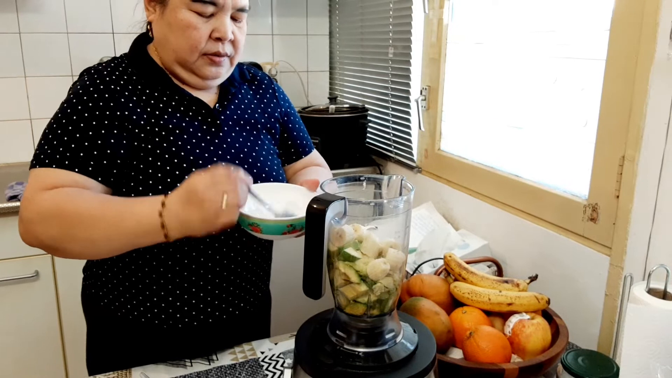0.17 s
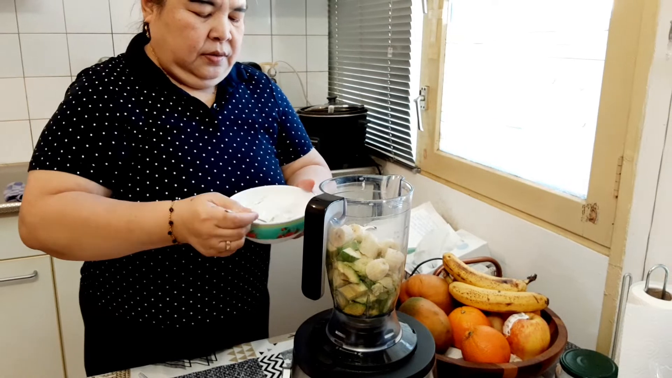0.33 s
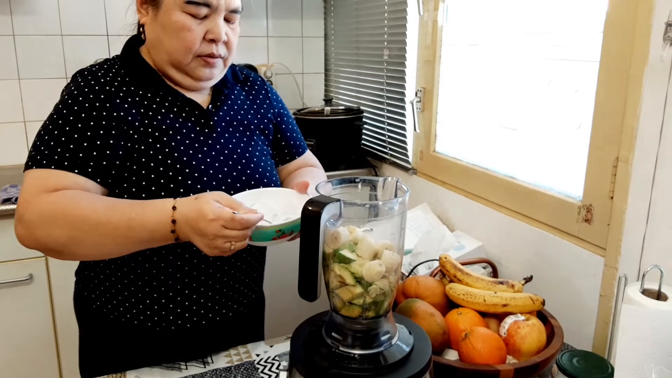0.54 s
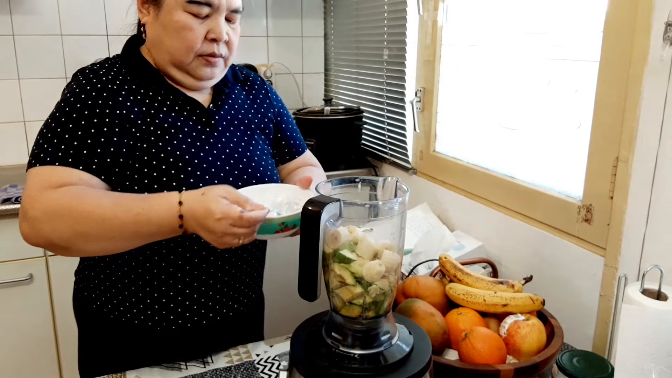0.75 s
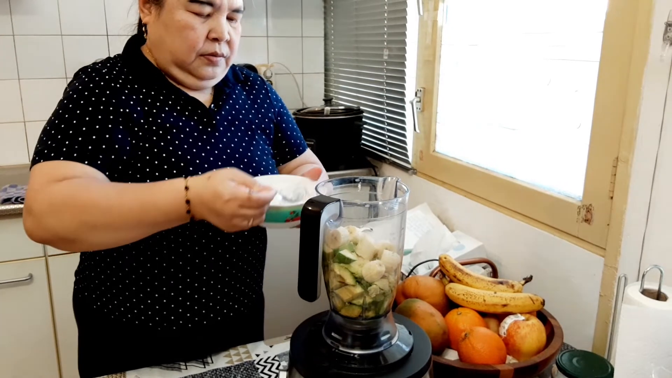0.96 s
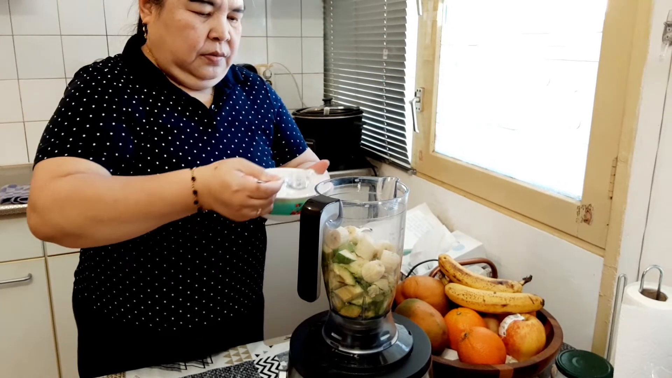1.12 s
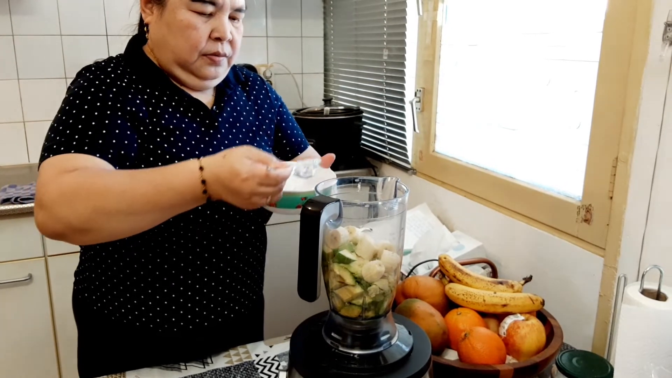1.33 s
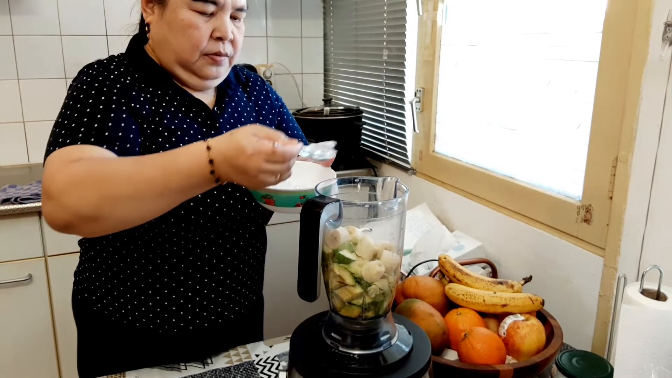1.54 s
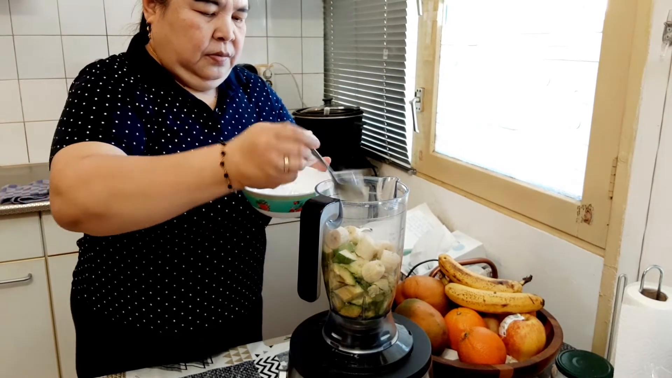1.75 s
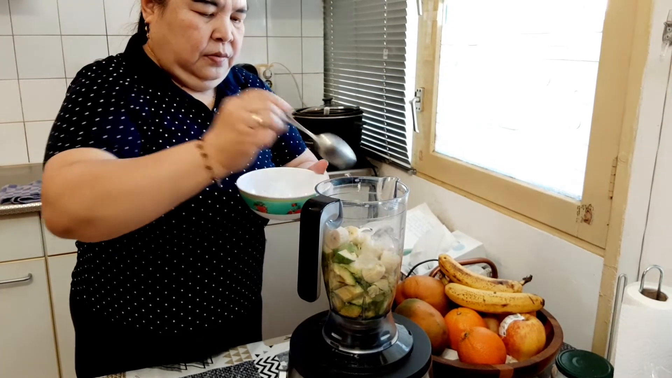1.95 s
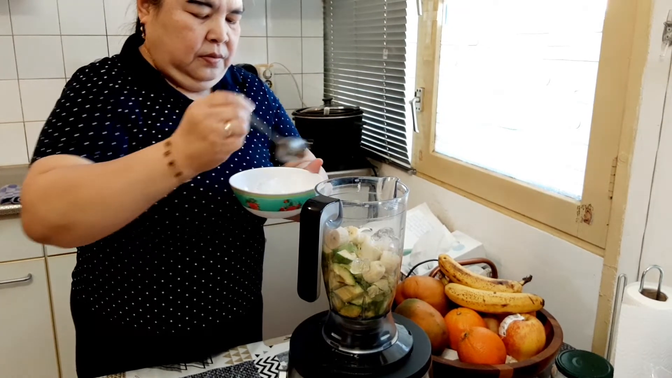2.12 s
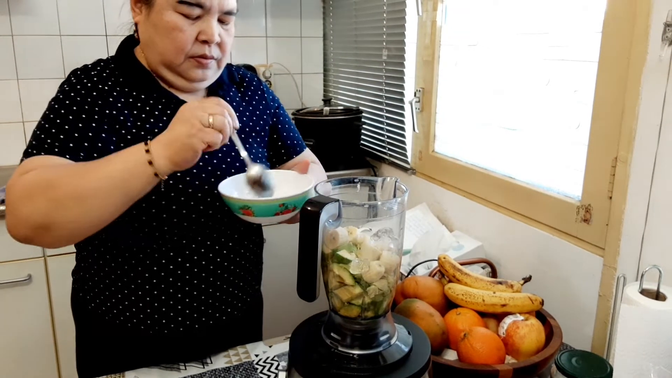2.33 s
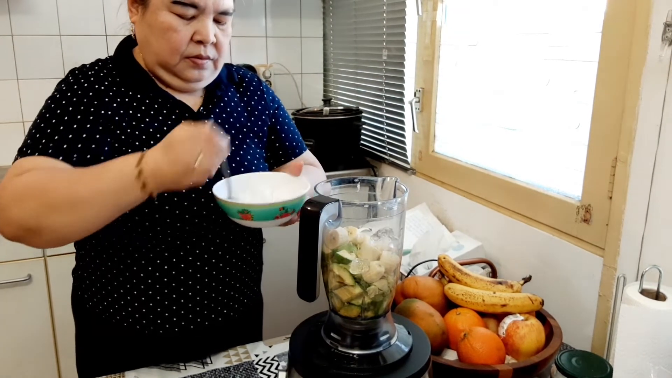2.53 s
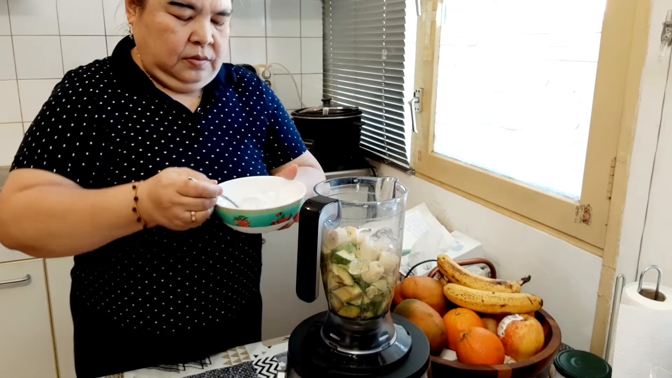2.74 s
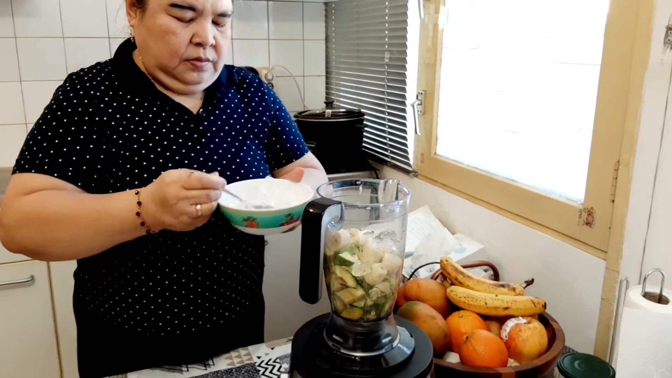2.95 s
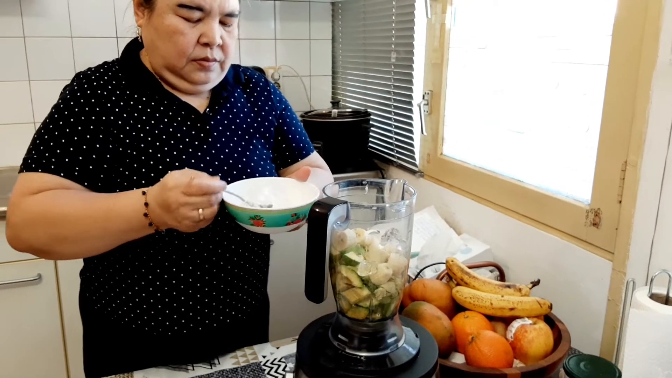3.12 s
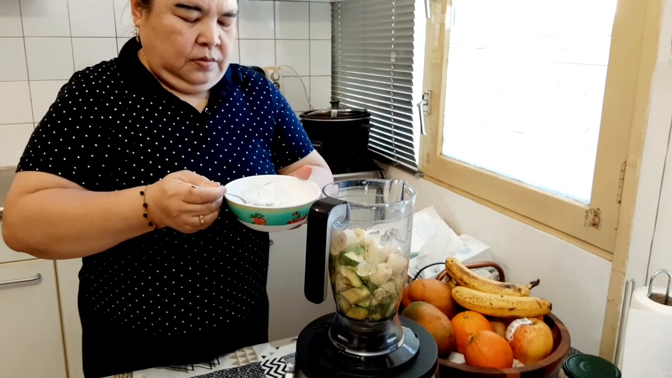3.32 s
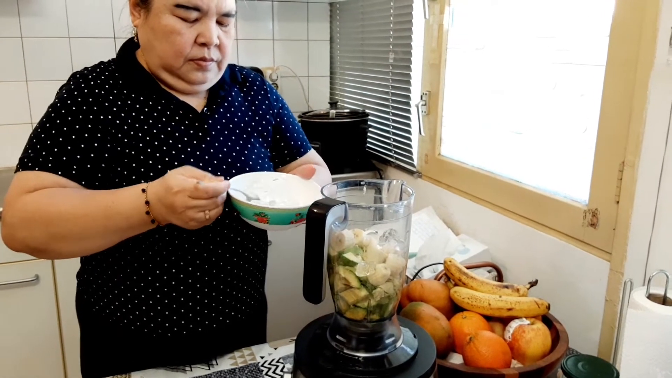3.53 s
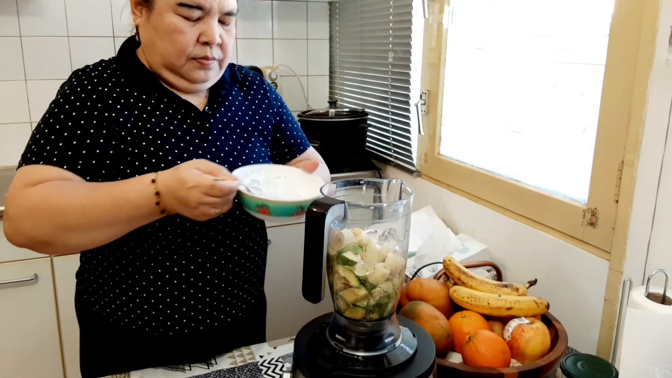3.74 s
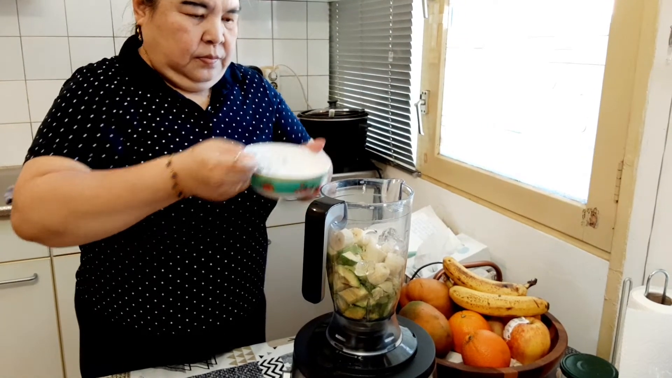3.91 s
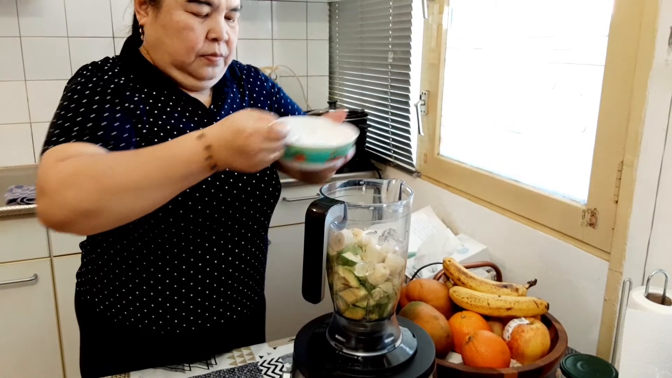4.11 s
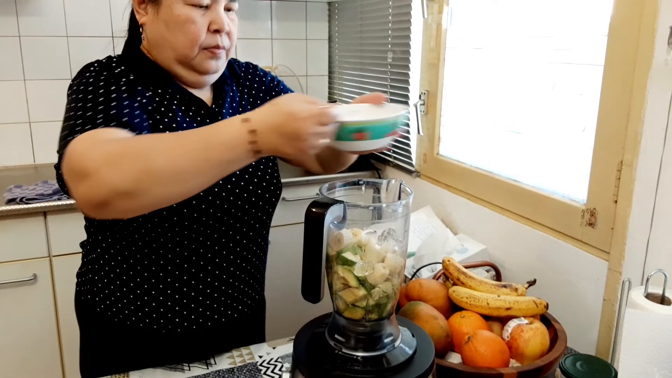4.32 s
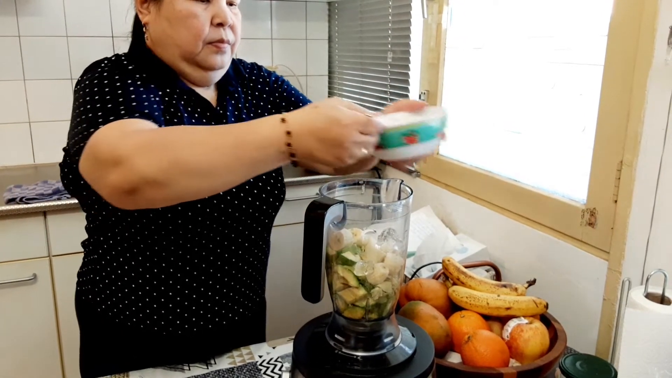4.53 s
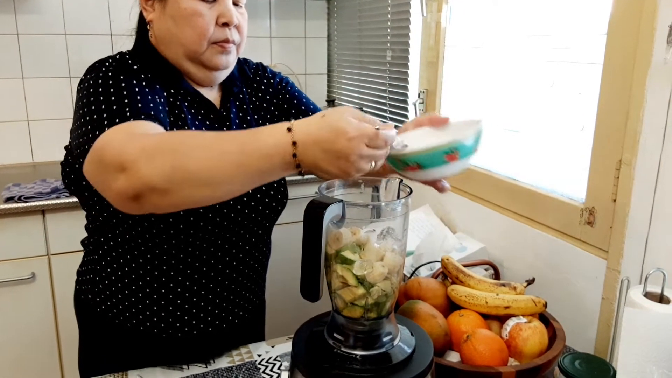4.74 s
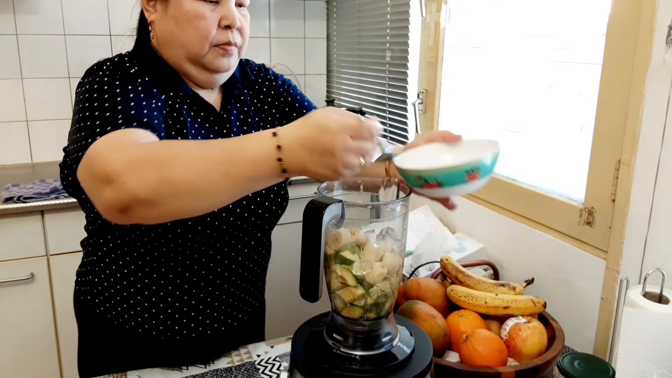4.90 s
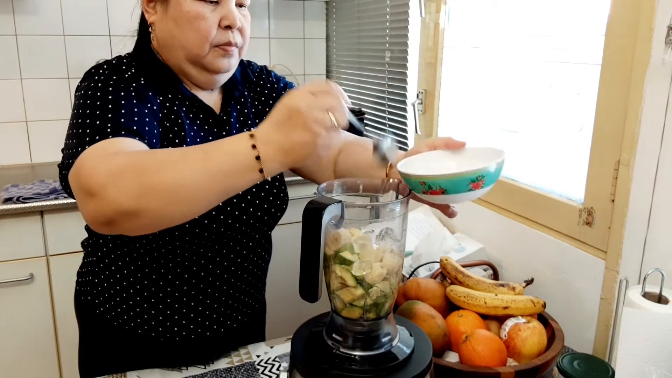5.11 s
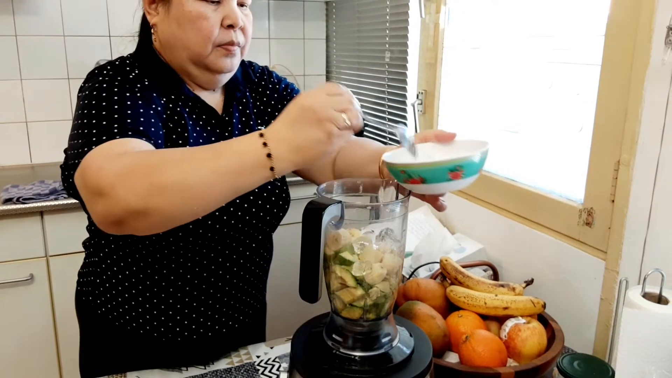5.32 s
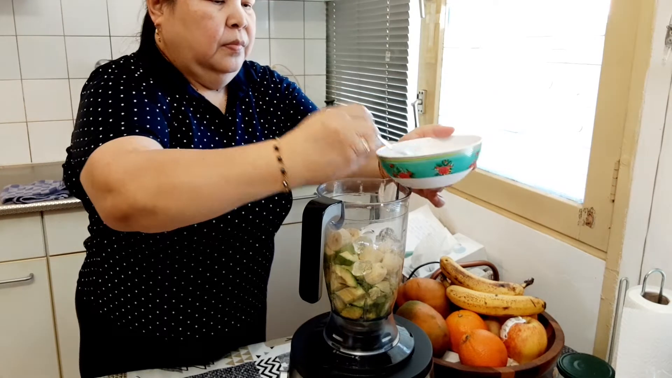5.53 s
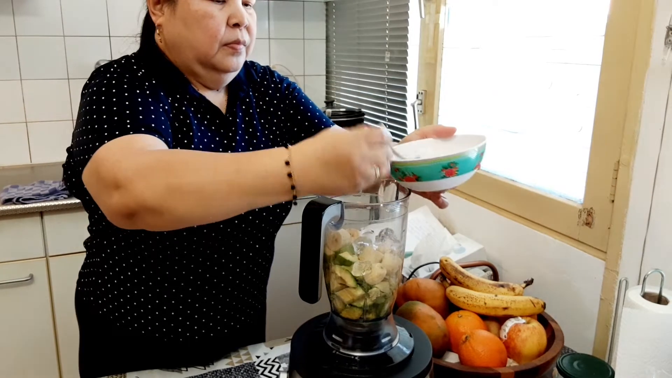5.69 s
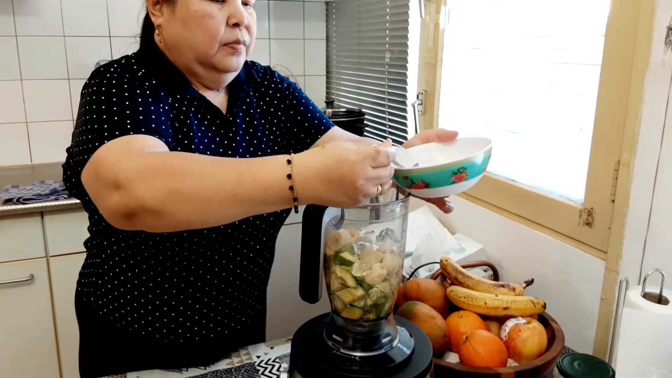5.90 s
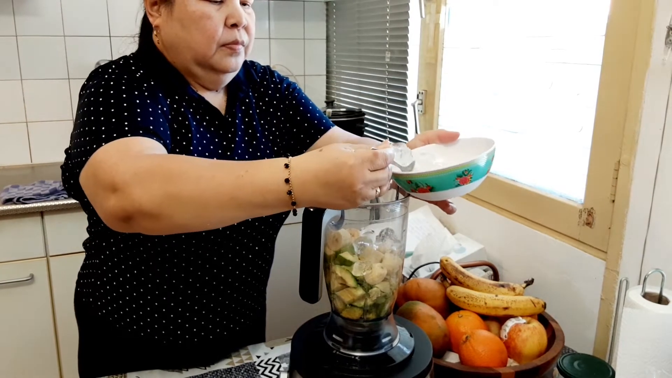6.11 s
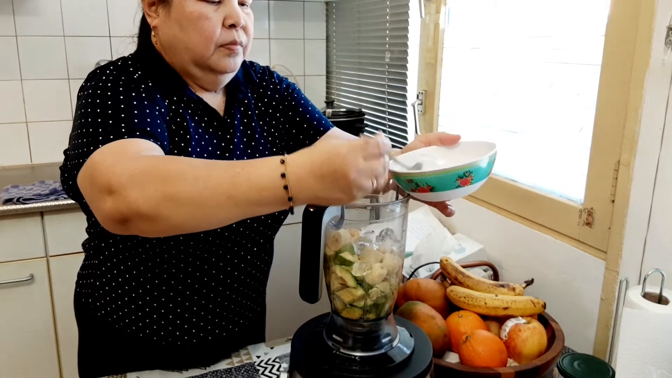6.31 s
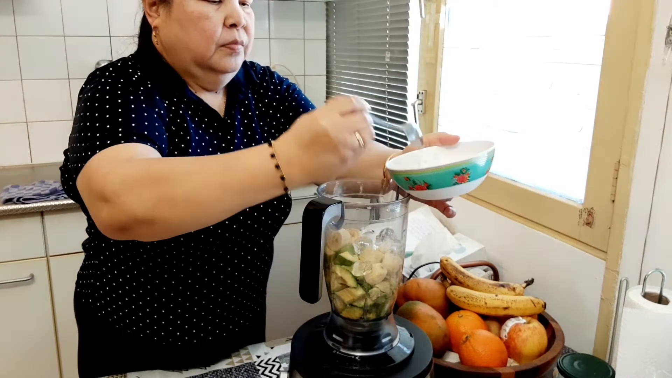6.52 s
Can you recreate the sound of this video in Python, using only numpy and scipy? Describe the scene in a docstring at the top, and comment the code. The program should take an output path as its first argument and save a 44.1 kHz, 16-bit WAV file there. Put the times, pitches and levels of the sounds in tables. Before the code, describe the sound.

Ice is spooned from a bowl into a blender jug holding fruit. Crunchy strokes and small bowl knocks lead to a rapid, hollow plastic clatter, then renewed digging, loose cubes rattling and a quieter shuffle. Another scoop ends in thuds and a bright spoon strike, followed by more scraping. Close pickup with short, hard tile echoes; a bird chirps very faintly outside.

```python
"""Ringing tiled kitchen: ice cubes are spooned out of a bowl into a plastic blender jug of cut fruit.
Coloured pulses make the knocks; resonators make bowl, jug and steel spoon ring after them.
Random ticks and friction hiss make the spoon's strokes through the ice; low noise bursts, the thuds on fruit.
A bird of raspy falling harmonics chirps faintly outside; room air and appliance hum lie underneath."""
import sys
import numpy as np
from scipy import signal
from scipy.fft import rfft, irfft, next_fast_len
from scipy.io import wavfile
from scipy.ndimage import uniform_filter1d

SR = 44100
rng = np.random.default_rng(int(sys.argv[2]) if len(sys.argv) > 2 else 0)


def dump_mix(stems):
    """Bounce the given channels to the path in sys.argv[1] as a 16-bit WAV at rate SR."""
    frames = np.atleast_2d(stems).T  # one column per channel
    limited = np.clip(frames, -1, 1)  # hard clip at full scale
    pcm = np.round(limited * 32767).astype(np.int16)
    wavfile.write(sys.argv[1], SR, pcm)


N = 289075
TIME = np.arange(N) / SR


def from_db(db):
    """Decibels to gain."""
    return 10 ** (np.asarray(db) / 20)


def rms_one(x):
    """Scale to rms 1."""
    return x / np.sqrt(np.mean(x ** 2) + 1e-20)


def at_hz(points, hz):
    """Read a table of (f/Hz, value) on a log-frequency axis."""
    table_hz, values = np.transpose(points)
    return np.interp(np.log(np.maximum(hz, 1)), np.log(table_hz), values)


def add(track, start_s, sound):
    """Mix a sound into the track."""
    start = round(start_s * SR)
    track[start:start + len(sound)] += sound[:N - start]


def split_filter(x, edges_hz, kind):
    """Third-order Butterworth filter."""
    return signal.sosfilt(signal.butter(3, edges_hz, kind, fs=SR, output="sos"), x)


def drift(per_s):
    """A slow random wander of spread about 1."""
    steps = rng.standard_normal(1000)
    return np.interp(TIME * per_s, np.arange(len(steps)), steps)


def impulse_of(colour_db, size=4096):
    """Minimum-phase pulse whose spectrum in dB is colour_db(hz), by folding the cepstrum."""
    cepstrum = irfft(np.log(from_db(colour_db(np.fft.rfftfreq(size, 1 / SR)))))
    cepstrum[1:size // 2] *= 2
    cepstrum[size // 2 + 1:] = 0
    return irfft(np.exp(rfft(cepstrum)))


def coloured(x, spectrum):
    """Filter by a table of (f/Hz, gain/dB)."""
    return signal.fftconvolve(x, impulse_of(lambda hz: at_hz(spectrum, hz)))[:len(x)]


def resonances(x, modes):
    """Ringing of a body's modes driven by x: one two-pole resonator per (f/Hz, width/Hz, peak gain/dB)."""
    out = np.zeros(N)
    for hz, width_hz, db in modes:
        r = np.exp(-np.pi * width_hz / SR)
        zeros = [(1 - r * r) / 2, 0, (r * r - 1) / 2]
        poles = [1, -2 * r * np.cos(2 * np.pi * hz / SR), r * r]
        out += from_db(db) * signal.lfilter(zeros, poles, x + 1e-18)
    return out


def chatter(pulse, gaps_s, rebound=0.74):
    """A hard contact rebounds within a few milliseconds: allpass echoes smear the pulse."""
    size = next_fast_len(len(pulse), True)
    hz, spectrum = np.fft.rfftfreq(size, 1 / SR), rfft(pulse, size)
    for gap_s in gaps_s:
        delay = np.exp(-2j * np.pi * hz * round(gap_s * SR) / SR)
        spectrum = spectrum * (delay - rebound) / (1 - rebound * delay)
    return irfft(spectrum, size)[:len(pulse)]


# spectrum shape of the room air: f/Hz, relative density/dB
ROOM_TONE = [(20, -26.5), (60, -12), (130, 2), (300, -1.5), (650, -7), (1300, -6.5), (2000, -3),
             (3000, -36.5), (7000, -31.5), (9000, -53.5), (15000, -18)]
# appliance hum: f/Hz, rms level/dB
HUM = [(193.8, -92), (301.5, -69.5)]
ROOM_TONE_DB = -63.5


def background():
    """Coloured noise for quiet room air, steady sines for a faint appliance hum."""
    air = from_db(ROOM_TONE_DB) * rms_one(coloured(rng.standard_normal(N), ROOM_TONE))
    hum = sum(from_db(db) * np.sqrt(2) * np.sin(2 * np.pi * hz * TIME) for hz, db in HUM)
    return air + hum


# kitchen reverberation: f/Hz, t60/s
KITCHEN_T60 = [(100, 0.18), (400, 0.42), (1000, 0.39), (2700, 0.36), (7000, 0.3), (15000, 0.26)]


def kitchen(first_echo_s=0.0015, echoes_per_s=2500, smooth_db=-4):
    """Room response of energy 1: distinct tile echoes in a diffuse tail, each band with its own decay."""
    t = TIME[:int(.7 * SR)]
    echoes = rng.standard_normal(len(t)) * (rng.random(len(t)) < echoes_per_s / SR)
    spectrum = rfft(rms_one(echoes) + from_db(smooth_db) * rng.standard_normal(len(t)))
    hz, centres_hz = np.fft.rfftfreq(len(t), 1 / SR), np.geomspace(100, 16000, 16)
    tail = np.zeros(len(t))
    for centre_hz, pick in zip(centres_hz, np.eye(len(centres_hz))):
        share = np.interp(hz, centres_hz, pick)  # triangular band
        decay = from_db(-60 * t / at_hz(KITCHEN_T60, centre_hz))
        band = irfft(spectrum * share, len(t)) * decay * (t > first_echo_s)
        tail += rms_one(band) * np.sqrt(share.mean())
    return rms_one(tail) / np.sqrt(len(t))


def in_kitchen(x, split_hz=2900, slow_per_s=4, fast_per_s=140):
    """Each spot has its own echoes: long waves follow the moving hands, short ones differ from cube to cube."""
    low, high = split_filter(x, split_hz, "low"), split_filter(x, split_hz, "high")
    spots, out = np.arange(7), np.zeros(N)
    for here in np.eye(len(spots)):
        # equal-power crossfades cycling through the spots
        slow, fast = (np.sin(np.pi / 2 * np.interp(TIME * rate, spots, here, period=len(spots)))
                      for rate in (slow_per_s, fast_per_s))
        out += signal.fftconvolve(low * slow + high * fast, kitchen())[:N]
    return out


# bird chirps: t/s, relative level/dB, starting f/Hz, length/s
CHIRPS = [(1.548, -54.5, 1228, 0.074), (2.074, -58, 1128, 0.047), (2.253, -59.5, 1285, 0.11),
          (2.316, -52, 1140, 0.029), (4.819, -57, 1265, 0.043), (4.878, -53, 1146, .055),
          (5.084, -55, 1128, 0.036), (5.209, -51.5, 1116, 0.035)]
# partials of a chirp: multiple of the pitch, relative level/dB
CHIRP_PARTIALS = [(1, -3.5), (2, 2.5), (4, -12), (5, -14), (7, -18)]
CHIRP_FALL_HZ = 172


def bird(waver=0.0614, yard_db=-3, yard_t60_s=0.7):
    """Short raspy falling chirps, strongest on the second partial, echoing between the walls outside."""
    out, t = np.zeros(N), TIME[:SR]
    for s, db, first_hz, length_s in CHIRPS:
        progress = np.linspace(0, 1, int(length_s * SR))
        wobble = rms_one(uniform_filter1d(rng.standard_normal(SR), size=50))[:len(progress)]
        pitch_hz = (first_hz - CHIRP_FALL_HZ * progress) * (1 + waver * wobble)
        phase = 2 * np.pi * np.cumsum(pitch_hz) / SR
        tone = sum(from_db(part_db) * np.sin(k * phase) for k, part_db in CHIRP_PARTIALS)
        envelope = np.sqrt(2) * np.sin(np.pi * np.sqrt(progress))
        add(out, s, from_db(db) * rms_one(tone) * envelope)
    yard = rms_one(rng.standard_normal(SR) * from_db(-60 * t / yard_t60_s)) / np.sqrt(SR)
    return out + from_db(yard_db) * signal.fftconvolve(out, yard)[:N]


# cubes landing on the fruit: t/s, relative level/dB, centre f/Hz
THUDS = [(5.031, -42, 413), (5.316, -29.5, 350), (5.957, -35.5, 287), (6.273, -37, 286), (6.366, -36, 303)]
# dull bumps of the hand on the bowl: t/s, relative level/dB, decay time constant/s
BUMPS = [(3.185, -52.5, 0.1), (3.245, -55, 0.084), (4.421, -54, 0.11), (4.521, -57, 0.19)]
THUD_DECAY_S, REBOUND_S, REBOUND_LOSS_DB = 0.026, 0.048, 9
BUMP_HZ = 149


def thuds(spread=1.66, attack_s=0.0011):
    """Soft contacts give only a short low rumble; each cube on the fruit rebounds once, weaker."""
    out, t = np.zeros(N), TIME[:SR // 2]
    hits = [(s + k * REBOUND_S, db - k * REBOUND_LOSS_DB, hz, THUD_DECAY_S)
            for s, db, hz in THUDS for k in range(2)]
    hits += [(s, db, BUMP_HZ, decay_s) for s, db, decay_s in BUMPS]
    for s, db, hz, decay_s in hits:
        band = signal.butter(2, [hz / spread, hz * spread], "band", fs=SR, output="sos")
        rumble = rms_one(signal.sosfilt(band, rng.standard_normal(len(t))))
        envelope = (1 - np.exp(-t / attack_s)) * np.exp(-t / decay_s)
        add(out, s, from_db(db) * rumble * envelope)
    return out


# a light knock is duller: strength/dB, bass gain/dB
KNOCK_BASS = [(-9, 1), (0, -7), (40.5, -11)]
# spectrum common to all knocks: f/Hz, gain/dB
KNOCK_COLOUR = [(25, -36), (60, -28), (150, -11), (300, -7), (650, -6.5), (1200, -2.5), (3000, -5.5),
                (5500, -2), (7600, -4.5), (8800, -10), (12000, -11), (15500, -16.5)]


def knocks(rows, gap_s, bass_hz=480, mid_low_hz=1200, mid_high_hz=2600, treble_hz=6000):
    """Each knock is a chattering pulse, coloured by the broad modes of the cube that is hit."""
    out = np.zeros(N)
    for (s, db, treble_db), draws in zip(rows, rng.random((len(rows), 16))):
        gaps_s = (.2 + .8 * draws[:4]) * gap_s
        cube_hz = 1500 * 10 ** draws[4:, None]
        bass_db = np.interp(db, *np.transpose(KNOCK_BASS))
        tilt = [(bass_hz, bass_db), (mid_low_hz, 0), (mid_high_hz, 0), (treble_hz, treble_db)]

        def colour_db(hz):
            """Tilt plus the strongest cube mode at each frequency, falling slightly to the treble."""
            modes = np.max(1 / (1 + ((hz / cube_hz - 1) * 35) ** 2), axis=0)
            return at_hz(tilt, hz) + 5 * modes - 2 * hz / (hz + 1500)

        softness = from_db(-np.clip(treble_db, -12, 4) / 2)  # dull contacts last longer
        add(out, s, from_db(db) * chatter(impulse_of(colour_db), gaps_s * softness))
    return coloured(out, KNOCK_COLOUR)


# cubes and spoon striking the jug: t/s, relative strength/dB, treble/dB
JUG_KNOCKS = [(1.772, -35, -12), (1.8528, 22, -16), (1.8652, 23.5, -11), (1.88, 25, -17),
              (1.8925, 14.5, -19), (1.9267, 20, -2), (1.937, 15.5, -26), (5.32, 3.5, -8.5),
              (5.422, 3, -11.5)]
# jug resonances: f/Hz, width/Hz, gain over the plain knock/dB
JUG_MODES = [(486.6, 13, 17.5), (778, 44, 9), (1270, 120, 1.5), (1384, 7.3, 3), (1740, 24, 12.5),
             (1786, 21, 9), (1980, 150, 3), (2120, 33, 3), (2310, 12, 1), (2570, 27, 4), (2690, 56, 3.5),
             (3460, 900, -5.5), (12900, 4300, 5)]


def jug(knock_db=-5.0, ring_db=0.0):
    """Falling cubes and the spoon set the plastic wall ringing."""
    blows = from_db(knock_db) * knocks(JUG_KNOCKS, gap_s=0.00095)
    return blows + from_db(ring_db) * resonances(blows, JUG_MODES)


# strokes through the ice: start t/s, length/s, relative level/dB, swell over the stroke/dB, treble/dB
STROKES = [(0.0, 0.17, -34, 5, 1), (0.192, 0.26, -29, -8.5, 3), (0.627, 0.14, -34.5, -11.5, -5),
           (0.846, 0.048, -30.5, -0.5, 1), (0.98, 0.25, -51.5, -5, 2.5), (1.761, 0.016, -36, -4, 4.5),
           (2.455, 0.28, -26.5, 0, 3.5), (2.816, 0.23, -27, -10.5, -8.5), (3.158, 0.16, -40.5, -9, 1.5),
           (3.49, 0.4, -47, 27, 2), (3.791, 0.14, -39.5, 26.5, -2), (4.062, 0.26, -43.5, -9.5, -1.5),
           (4.424, 0.37, -42, 6.5, -7), (5.03, 0.083, -50, 6, -1), (5.37, 0.15, -30, 17.5, -5.5),
           (5.675, 0.058, -21.5, -6.5, 7), (5.947, 0.068, -36, -9, 1), (6.113, 0.26, -35.5, 19.5, 2.5)]
# a light touch is duller: stroke level/dB, bass gain/dB
STROKE_BASS = [(-70, 20), (-36, 4), (-26, -1)]
STROKE_ATTACK_S, STROKE_RELEASE_S = 0.0084, 0.056
# between strokes the ice still shifts faintly in the held bowl
IDLE_DB, IDLE_BASS_DB, IDLE_TREBLE_DB = -71.5, 1, 12


def stroke_pressure():
    """Each stroke bites, swells or eases while it lasts, and lets go; gains of bass, middle and treble."""
    out, t = np.zeros((3, N)), TIME[:SR]
    for s, length_s, db, swell_db, treble_db in STROKES:
        level_db = db + swell_db * (np.minimum(t / length_s, 1) - .5)
        release = np.exp(-np.maximum(t - length_s, 0) / STROKE_RELEASE_S)
        gate = np.minimum(t / STROKE_ATTACK_S, 1) * release
        bass_db = np.interp(db, *np.transpose(STROKE_BASS))
        for band, tilt_db in zip(out, (bass_db, 0, treble_db)):
            add(band, s, gate * from_db(level_db + tilt_db))
    idle_db = IDLE_DB + np.array([[IDLE_BASS_DB], [0], [IDLE_TREBLE_DB]])
    return np.hypot(out, from_db(idle_db))


def slips(per_s, spread_db):
    """Stick-slip as random ticks of uneven size and either sign."""
    ticks = np.zeros(N)
    at = np.flatnonzero(rng.random(N) < per_s / SR)
    size_db = spread_db * np.minimum(rng.exponential(1, N)[at], 3)
    ticks[at] = from_db(size_db) * rng.choice([-1, 1], N)[at]
    return ticks


def cubes(per_s=170, shift_db=4, shifts_per_s=22):
    """The rubbed cubes ring briefly, and their pitches come and go as the heap shifts."""
    pitches_hz = np.geomspace(900, 9000, 16) * rng.uniform(.94, 1.06, 16)
    out = np.zeros(N)
    for hz in pitches_hz:
        rubs = slips(per_s, 3) * from_db(shift_db * drift(shifts_per_s))
        out += resonances(rubs, [(hz, hz / 28, 0)])
    return rms_one(out)


# spectrum of the grinding: f/Hz, gain/dB
GRIND_COLOUR = [(20, -62.5), (60, -18.5), (150, -22.5), (300, -6), (650, -3.5), (1200, 1.5), (2200, 0.5),
                (3600, -0.5), (5500, -7), (7600, -12), (8800, -17.5), (12000, -14), (15500, -28.5)]
# the spoon catches and jerks on its way through the heap
JERK_DB, JERKS_PER_S = 3, 35


def grinding(slips_per_s=320, spread_db=7.0, hiss_db=-10, cubes_db=-1.0, bass_hz=850, treble_hz=4000):
    """Wet ice sticks and slips on spoon and bowl: uneven ticks and ringing cubes over a thin friction hiss."""
    crunch = rms_one(chatter(slips(slips_per_s, spread_db), rng.uniform(.0001, .0006, 3)))
    ringing = from_db(cubes_db) * cubes()
    hiss = from_db(hiss_db) * rng.standard_normal(N)
    friction = rms_one(crunch + ringing + hiss)
    jerks = rms_one(from_db(JERK_DB * drift(JERKS_PER_S)))
    bands = [(bass_hz, "low"), ([bass_hz, treble_hz], "band"), (treble_hz, "high")]
    out = np.zeros(N)
    for (edges_hz, kind), pressure in zip(bands, stroke_pressure()):
        out += jerks * pressure * split_filter(friction, edges_hz, kind)
    return coloured(out, GRIND_COLOUR)


# tumble strength is relative to the stroke's level
TUMBLE_DB, TUMBLE_SPREAD_DB = 31.5, -1


def tumbles(treble_db=-2, count=64):
    """Loose cubes knock at random moments, harder when the spoon pushes harder; rows as in BOWL_KNOCKS."""
    draws, pressure = rng.random((count, 2)), stroke_pressure()[1]
    at = (draws[:, 0] * N).astype(int)
    pressure_db = 20 * np.log10(pressure[at] + 1e-9)
    db = pressure_db + TUMBLE_DB + TUMBLE_SPREAD_DB * (2 * draws[:, 1] - 1)
    return [(s, strength_db, treble_db) for s, strength_db in zip(at / SR, db)]


# clearest knocks of cubes in the bowl: t/s, relative strength/dB, treble/dB
BOWL_KNOCKS = [(0.0224, -4, -21), (0.1985, 1, 0.5), (0.251, -7, 14), (0.421, 2, -0.5), (0.645, 4, -6.5),
               (0.68, -0.5, -9), (0.8416, -3.5, -11), (0.893, -8, -6), (0.9029, 1.5, 2.5), (0.968, -2, -10),
               (1.1259, -10, -9), (2.478, 6.5, -4), (2.6275, 9.5, -6.5), (2.7732, 3, -3), (2.86, 4.5, -5.5),
               (2.9605, 5, -2), (3.025, 5, -1), (3.1359, 3, -7.5), (3.2426, -3, 1.5), (3.338, 6, -9.5),
               (3.538, -11.5, 2.5), (3.6263, -11.5, -8.5), (3.6976, -15.5, -4.5), (3.783, 2.5, -13),
               (3.9136, 8.5, 9), (3.921, 15.5, -12), (4.0483, 5, 4.5), (4.11, 0, 4), (4.1925, -0.5, -1.5),
               (4.4234, -9.5, -6), (4.5826, -2.5, -4.5), (4.6504, 0.5, -3), (4.6784, -1.5, 4),
               (4.738, 1.5, -10.5), (5.6561, 2.5, -8.5), (5.6951, 5, 0.5), (5.914, -2, -12),
               (6.3074, 3, -2.5), (6.3491, 3, 4.5)]
# bowl resonances: f/Hz, width/Hz, relative gain/dB
BOWL_MODES = [(666, 30, 14), (712, 86, 2), (948, 20, -1.5), (1145, 87, 3), (1227, 18, -12.5),
              (1461, 45, -1), (1840, 67, 6), (1940, 19, -7.5), (2700, 16, 1), (2777, 41, 1.5)]


def bowl(knock_db=-0.5, grind_db=-4.0, rub_db=-15):
    """Knocks set the bowl ringing freely; rubbing drives the same modes far less."""
    blows = from_db(knock_db) * knocks(BOWL_KNOCKS + tumbles(), gap_s=.0006)
    rubbing = from_db(grind_db) * grinding()
    return blows + rubbing + resonances(blows + from_db(rub_db) * rubbing, BOWL_MODES)


# steel spoon clinking on ice and bowl: t/s, relative strength/dB, treble/dB
SPOON_CLINKS = [(0.07, -3, 14.5), (2.3502, -2.5, 11), (2.439, 2.5, 6), (3.8842, -11.5, 18),
                (5.4746, 3.5, 2.5), (5.5153, 21, -4.5), (5.556, -15, -9), (6.1894, -6, 1)]
# spoon resonances: f/Hz, width/Hz, gain over the plain knock/dB
SPOON_MODES = [(4250, 23, -19), (4500, 39, 10.5), (5190, 48, -1), (6300, 28, -29.5), (7460, 18, -8),
               (7620, 25, 13), (11700, 33, 11), (11500, 20, 6), (12900, 29, 17.5)]


def spoon(knock_db=0.0, bowl_db=1.5):
    """A free blow leaves both the steel spoon and the bowl ringing."""
    blows = from_db(knock_db) * knocks(SPOON_CLINKS, gap_s=.0008)
    return blows + resonances(blows, SPOON_MODES) + from_db(bowl_db) * resonances(blows, BOWL_MODES)


def scene(direct_db=-5.0, room_db=-1.95, bird_direct_db=-4, bird_room_db=-1.5):
    """Counter work and bird, each direct and through the room's echoes, over the background."""
    counter, outside = bowl() + spoon() + jug() + thuds(), bird()
    direct = from_db(direct_db) * counter + from_db(bird_direct_db) * outside
    reverberant = in_kitchen(from_db(room_db) * counter + from_db(bird_room_db) * outside)
    return (direct + reverberant + background())[None]


CUTOFF_HZ = 16200


def record(dry):
    """The top is cut steeply by an elliptic low-pass: 0.3 dB ripple, 70 dB stopband."""
    return signal.sosfilt(signal.ellip(10, .3, 70, CUTOFF_HZ, fs=SR, output="sos"), dry)


dry = scene()
out = record(dry)
dump_mix(out)
```